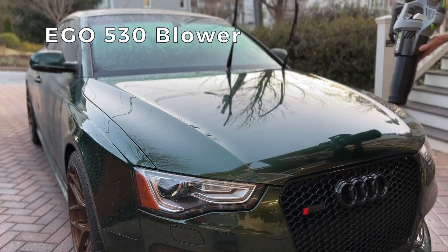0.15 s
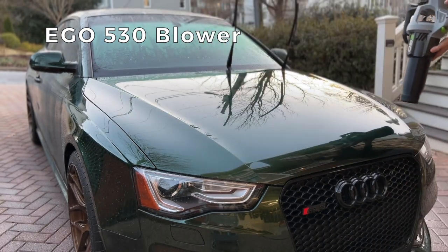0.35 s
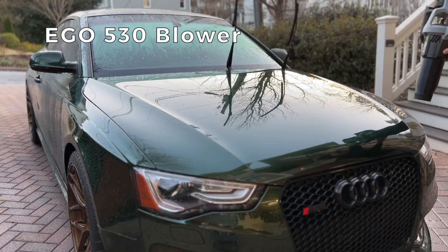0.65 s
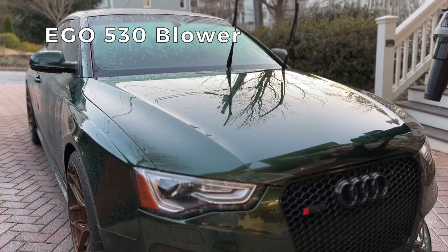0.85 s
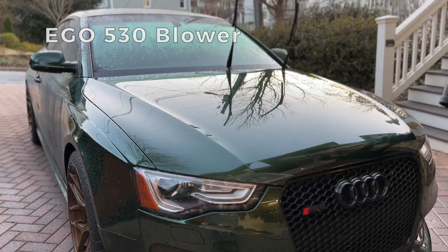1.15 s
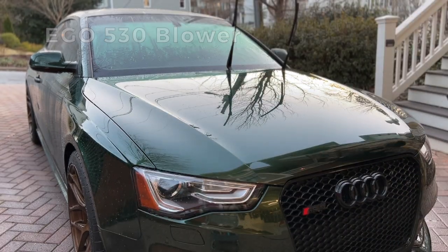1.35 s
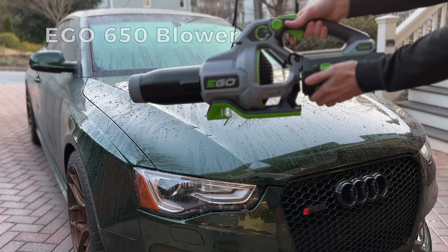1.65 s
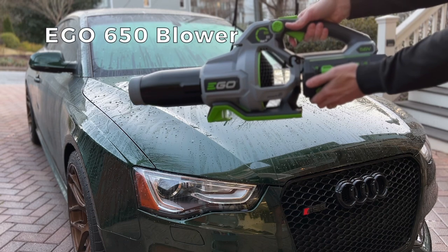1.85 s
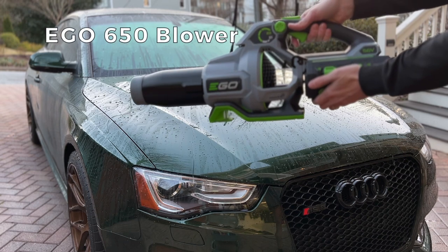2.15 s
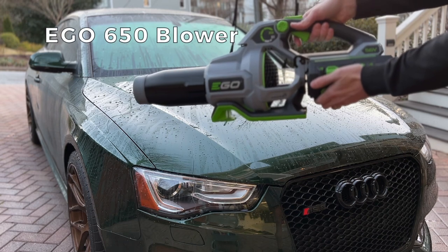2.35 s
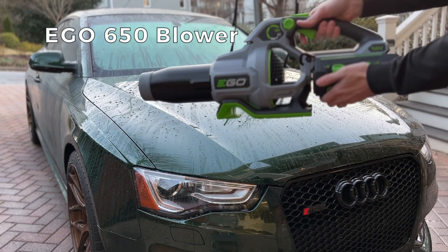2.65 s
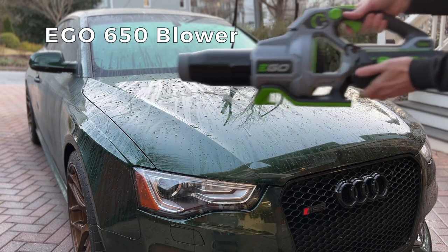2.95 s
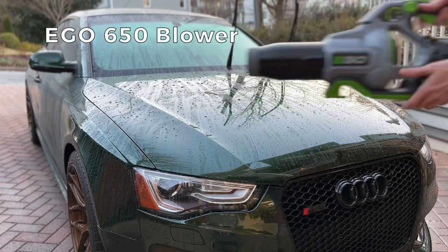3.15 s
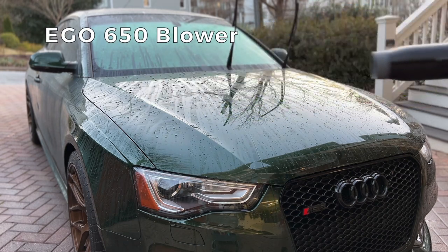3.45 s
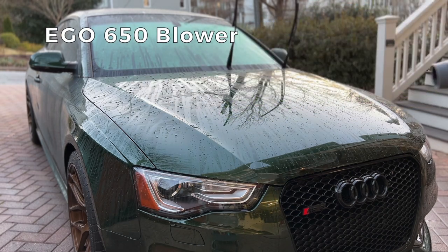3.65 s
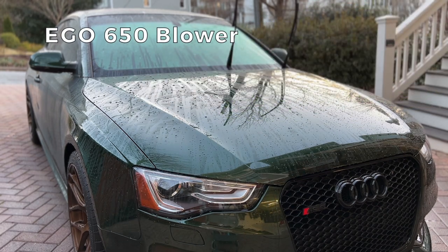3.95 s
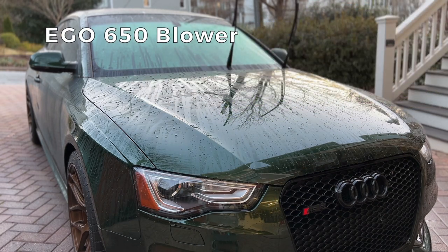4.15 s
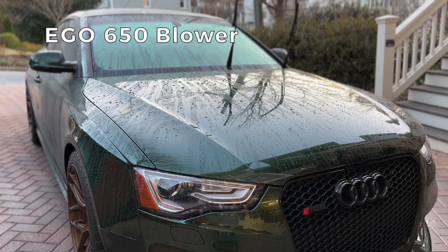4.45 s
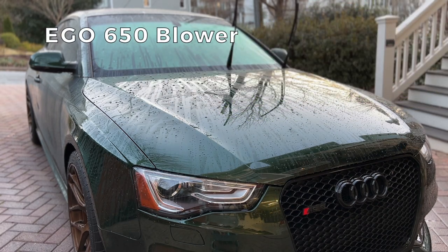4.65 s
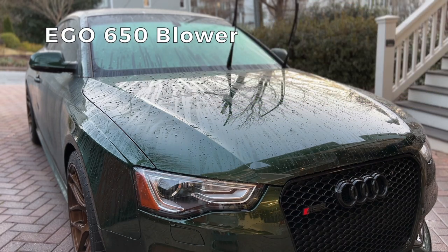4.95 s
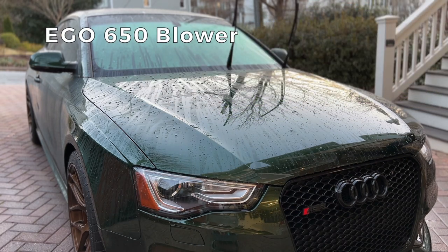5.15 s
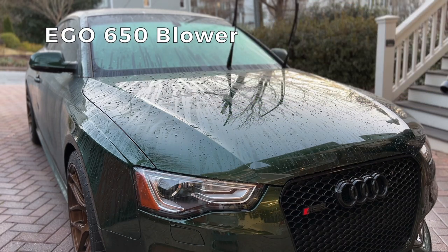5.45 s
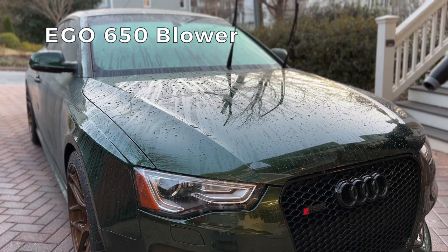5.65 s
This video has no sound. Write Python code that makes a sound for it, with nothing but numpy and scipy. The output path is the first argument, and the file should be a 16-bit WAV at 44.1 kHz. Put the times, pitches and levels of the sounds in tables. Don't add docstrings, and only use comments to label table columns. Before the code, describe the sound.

Outdoors in a driveway, close stereo microphone: a battery blower already at full speed roars with rumble, airy hiss and a fuzzy whistle. It briefly starts to slow, then cuts hard to a quiet yard with faint traffic, cloth rustle, small handling ticks and one buzzy bird call. Near the end a second blower kicks in with a ringing tube and whines quickly up to a bright, steady blast.

```python
import sys
import numpy as np
from scipy import signal
from scipy.io import wavfile
from scipy.ndimage import uniform_filter1d

SR = 44100
rng = np.random.default_rng(int(sys.argv[2]) if len(sys.argv) > 2 else 0)


def magnitude_from_level(level_db):
    exponent = np.asarray(level_db, float) / 20
    return 10 ** exponent


def dump(signal):
    limited = np.clip(np.atleast_2d(signal).T, -1, 1)
    pcm = np.round(limited * 32767).astype(np.int16)
    wavfile.write(sys.argv[1], SR, pcm)


N = 255780

# time in seconds, turns per second.
SHAFT_SPEED = [
    [(0, 370.6), (1.26, 370.6), (1.35, 338), (1.42, 315), (1.487, 300)],
    [(4.878, 120), (5.0, 165), (5.05, 212), (5.17, 295), (5.28, 352), (5.42, 417), (5.51, 444.3),
     (5.8, 444.3)],
]
# frequency in Hz, density in dB per Hz.
HISS_SPECTRUM = [(2500, -33.5), (4000, -1.5), (6500, -1.5), (9000, -5), (10300, -3.5), (12000, -0.5),
                 (14000, -5.5), (15500, -8)]
# frequency in Hz, left-right likeness from 0 to 1,
# radians the right leads beyond the delay, left minus right in dB.
MIC_PORTS = [(80, .998, -.04, .6), (250, .92, .2, .6), (700, .66, 1.0, -2.3), (1700, .7, .1, -2.3),
             (3400, .35, -.95, 1.3), (6200, .3, -.3, 1.3), (9000, .68, -.3, -1), (14500, .67, -.4, 0)]


def evened(x):
    return x / np.sqrt(np.mean(x ** 2) + 1e-20)


def read(points, hz, col=1):
    table = np.transpose(points)
    return np.interp(np.log(hz + 1), np.log(table[0] + 1), table[col])


def curves(rows, t):
    s, *columns = np.transpose(rows)
    return [np.interp(t, s, c) for c in columns]


def add(mix, s, sound):
    part = mix[..., round(s * SR):][..., :sound.shape[-1]]
    part += sound[..., :part.shape[-1]]


def drift(size, rate):
    smooth = round(SR / rate)
    once = uniform_filter1d(rng.standard_normal((2, size)), smooth)
    return evened(uniform_filter1d(once, smooth))


def resonate(x, hz, width):
    turn = np.exp(2j * np.pi * np.cumsum(hz * np.ones(x.shape[-1])) / SR)
    r = np.exp(-np.pi * width / SR)
    return 2 * (turn * signal.lfilter([1 - r], [1, -r], x / turn)).real


def lead_at(hz):
    port_delay_s = 152e-6
    return 2 * np.pi * hz * port_delay_s + read(MIC_PORTS, hz, col=2)


def diffuse(spectrum, size, patchy_db):
    frames, hz = size // 256 + 5, np.fft.rfftfreq(1024, 1 / SR)
    a, b, c, d, patches = rng.standard_normal((frames, 513, 5)).T
    patches = evened(uniform_filter1d(uniform_filter1d(patches, 14, 0), 12, 1))
    same = np.clip(read(MIC_PORTS, hz), 0, 1)[:, None]
    left = a + 1j * b
    right = same * left + np.sqrt(1 - same ** 2) * (c + 1j * d)
    right = right * np.exp(1j * lead_at(hz))[:, None]
    tilt = magnitude_from_level(read(MIC_PORTS, hz, 3) / 2)[:, None]
    z = np.array([left * tilt, right / tilt]) * magnitude_from_level(read(spectrum, hz)[:, None] + patchy_db * patches)
    return evened(signal.istft(z, nperseg=1024, noverlap=768)[1][:, :size])


def tone(hz, waver_db, lead=None):
    lead = np.array([[0], [lead_at(np.mean(hz)) if lead is None else lead]])
    swell = magnitude_from_level(waver_db * drift(len(hz), 22))
    return np.sqrt(2) * swell * np.cos(2 * np.pi * (np.cumsum(hz) / SR + rng.random()) + lead)


def glides(rows):
    out = np.zeros((2, N))
    for s, length, from_hz, to_hz, db in rows:
        hz = np.linspace(from_hz, to_hz, round(length * SR))
        add(out, s, magnitude_from_level(db) * tone(hz, 1.5) * np.hanning(len(hz)))
    return out


def level_db(row, t, speed):
    db, per_decade_db, swing_db, loudest_s = row
    swing_s = 1.2
    swing = swing_db * np.cos(2 * np.pi * (t - loudest_s) / swing_s)
    return db + per_decade_db * np.log10(speed / speed.max()) + swing


def blower(shaft, middle, layers, whistle, casing, parting, bright_db, nozzle, recede_db, orders, orders_db):
    # frequency in Hz, density in dB per Hz.
    rumble_spectrum = [(30, -39), (60, -4), (100, -4), (150, -7.5), (200, -3), (400, -1.5), (550, -6.5),
                       (800, -26.5)]
    jet_spectrum = [(300, -22.5), (600, -6.5), (800, -0.5), (1300, -1.5), (1600, 2.5), (2400, 1),
                    (3400, -0.5), (4200, -16.5), (5500, -29)]
    # time in seconds, spread in seconds, added rumble in dB.
    gusts = [(0.0, .06, 4.5), (.84, .07, 5), (1.3, .05, 3.5), (5.2, .08, 3.5)]
    # offset in shaft multiples, width in Hz, level in dB.
    cells = [(-.55, 50, -1), (-.05, 45, 0), (.38, 30, 0), (-.1, 480, 2)]
    t = np.arange(shaft[0][0], shaft[-1][0], 1 / SR)
    speed, = curves(shaft, t)
    jet, rumble, hiss = (magnitude_from_level(level_db(row, t, speed)) for row in layers)

    gust_db = sum(db * np.exp(-((t - s) / spread) ** 2) for s, spread, db in gusts)
    flow = rumble * magnitude_from_level(gust_db + 1.2 * drift(len(t), 12)[0]) * diffuse(rumble_spectrum, len(t), 0.56)
    tilted_hiss = [(hz, db + bright_db * np.log2(hz / 8000)) for hz, db in HISS_SPECTRUM]
    flow += hiss * magnitude_from_level(5.0) * diffuse(tilted_hiss, len(t), 1.6)
    flow += jet * magnitude_from_level(4.0) * diffuse(jet_spectrum, len(t), 1.6)

    spread, swirl = parting * (speed / speed.max()) ** 3, 0
    multiple = curves(middle, t)[0]
    for offset, width, db in cells:
        centre = speed * (multiple + offset * spread) * (1 + .004 * drift(len(t), 9)[0])
        cell = resonate(resonate(rng.standard_normal((2, len(t))), centre, width), centre, 3 * width)
        swirl = swirl + magnitude_from_level(db + 2.5 * drift(len(t), 9)[0]) * evened(cell)
    casing_hz, width, casing_db = casing
    near = (speed * multiple - casing_hz) / width
    flow += magnitude_from_level(level_db(whistle, t, speed) + casing_db * np.exp(-near ** 2)) * evened(swirl)

    nozzle_hz, width, nozzle_db = nozzle
    blown = evened(resonate(rng.standard_normal((2, len(t))), nozzle_hz, width))
    flow += jet * magnitude_from_level(nozzle_db + 1.4 * drift(len(t), 6.1)) * blown
    flow += jet * sum(magnitude_from_level(db) * tone(k * speed, 3.5) for k, db in zip(orders, orders_db))
    started = np.clip(np.where(t[0] > 0, (t - t[0]) / 0.023, 1), 0, 1)
    return t[0], started * magnitude_from_level(recede_db * (t - t[0])) * flow


def both_blowers():
    # time in seconds, shaft multiple.
    swirl_centre = [
        [(0, 8.05), (1.3, 8.05), (1.49, 7.8)],
        [(4.88, 8.0), (5.27, 8.2), (5.35, 7.7), (5.41, 7.8), (5.5, 7.9), (5.65, 8.2), (5.8, 8.35)],
    ]
    # level in dB, dB per tenfold speed,
    # swing depth in dB, loudest at seconds.
    air_layers = [
        [(-29, 54, -0.14, .2), (-27.5, 88, 0, 0.75), (-27, 56, 0.2, 0.11)],
        [(-32.5, 30.5, 0.13, 5.4), (-31.5, 55.5, 3, 5.3), (-25.5, 51, 0.1, 6.6)],
    ]
    swirl_level = [(-25.5, 45, 1.3, .17), (-28.5, 52, .3, 5.3)]
    # frequency in Hz, width in Hz, gain in dB.
    casing_modes = [(2600, 330, 6), (2300, 850, 12)]
    cell_parting = [1.0, 1.4]
    hiss_tilt = [-0.5, 2.5]
    # frequency in Hz, width in Hz, dB over the jet.
    nozzle_modes = [(1567, 22, -12.5), (2170, 130, -6)]
    recede = [-1.51, 0.04]
    # shaft multiples, then their dB over the jet.
    fan_orders = [
        [1, 9, 24, 36],
        [5, 20],
    ]
    fan_orders_db = [
        [-13, -23, -19, -24],
        [-14, -17.5],
    ]
    return [blower(*parts) for parts in zip(
        SHAFT_SPEED, swirl_centre, air_layers, swirl_level, casing_modes, cell_parting, hiss_tilt,
        nozzle_modes, recede, fan_orders, fan_orders_db)]


def motor_tones(shaft, orders, rows):
    t = np.arange(shaft[0][0], shaft[-1][0], 1 / SR)
    speed, = curves(shaft, t)
    return t[0], sum(magnitude_from_level(level_db(row, t, speed)) * tone(k * speed, 2.0, lead=np.pi / 3)
                     for k, row in zip(orders, rows))


def both_motors():
    magnet_orders = [
        [3, 6, 12, 18],
        [1, 9, 12],
    ]
    # level in dB, dB per tenfold speed, swing depth in dB,
    # loudest at seconds.
    magnet_levels = [
        [(-44, 120, 3, .94), (-42.5, 30, 4.5, .43), (-45, 220, 3, .03), (-44, 150, 2.5, .42)],
        [(-41, 85, 2, 5.58), (-46, 110, 6, 5.85), (-39, 400, 1.5, 5.75)],
    ]
    return [motor_tones(*parts) for parts in zip(SHAFT_SPEED, magnet_orders, magnet_levels)]


def panel_buffets():
    # start in seconds, length in seconds, from Hz, to Hz, level in dB.
    buffets = [(5.3, 0.22, 96, 101, -34.5), (5.32, 0.2, 148, 161, -37), (5.32, .16, 490, 170, -41),
               (0.68, 0.091, 210, 480, -32.5)]
    return glides(buffets)


def brief_whines():
    # start in seconds, length in seconds, from Hz, to Hz, level in dB.
    whines = [(1.32, .075, 13550, 12680, -30), (5.115, .09, 12780, 13250, -35),
              (5.195, .065, 12900, 13600, -30), (4.88, .2, 10085, 10085, -48),
              (5.405, .08, 4950, 5180, -33)]
    return glides(whines)


def yard():
    # frequency in Hz, density in dB per Hz.
    yard_spectrum = [(25, -18), (55, 0), (100, -8), (200, -13), (500, -20), (800, -29), (1300, -39),
                     (2500, -46), (5000, -50), (8000, -56), (10500, -57), (12500, -48), (14000, -62)]
    cloth_spectrum = [(800, 0), (1800, 12.5), (4000, -3.5), (7000, -2.5), (10000, 0), (12500, 7),
                      (15000, -9.5)]
    # hum frequency in Hz, level in dB.
    mains_hum = [(60, -63.5), (238, -78)]
    # time in seconds, held seconds, level in dB.
    cloth_rubs = [(2.62, .05, -99), (2.95, .01, -87.5), (3.29, .02, -85), (3.42, .03, -81.5),
                  (3.6, .06, -80.5), (3.89, .03, -84), (4.01, 0.075, -82), (4.22, 0.068, -86),
                  (4.53, 0.011, -86), (4.71, .04, -83.5), (4.84, .04, -75)]
    # time in seconds, level in dB.
    handling = [(2.94, -76), (3.132, -68), (3.325, -78.5), (3.435, -72), (4.345, -79), (4.705, -72.5)]
    rise_db_per_s, fade_db_per_s = 260, 80
    t = np.arange(N) / SR
    out = magnitude_from_level(-61.5 + .8 * drift(N, 3)[0]) * diffuse(yard_spectrum, N, 1.2)
    out += sum(magnitude_from_level(db) * tone(np.full(N, hz), 2.98) for hz, db in mains_hum)
    rubs = 0
    for s, held, db in cloth_rubs:
        rise_db = rise_db_per_s * np.maximum(s - t, 0)
        fade_db = fade_db_per_s * np.maximum(t - s - held, 0)
        rubs = rubs + magnitude_from_level(db - rise_db - fade_db)
    ticks = sum(magnitude_from_level(db - 60 * np.clip(t - s, 0, 1) / .07) * np.clip((t - s) / .004, 0, 1)
                for s, db in handling)
    out += (rubs * magnitude_from_level(2.0 + 2.0 * drift(N, 90)[0]) + ticks) * diffuse(cloth_spectrum, N, 2.5)
    return out + magnitude_from_level(-5.0) * ticks * diffuse(HISS_SPECTRUM, N, 1.0)


def far_notes():
    # start in seconds, length in seconds, from Hz, to Hz, level in dB.
    notes_far_off = [(1.56, 0.16, 432, 427, -66.5), (1.64, 0.055, 1880, 1840, -85),
                     (1.84, 0.043, 1850, 1850, -82), (1.92, .08, 1850, 1850, -90.5),
                     (2.73, 0.15, 3900, 3880, -80), (2.77, 0.056, 422, 430, -64),
                     (3.29, .05, 1850, 1860, -81)]
    return glides(notes_far_off)


def bird():
    # time in seconds, level in dB, lowest Hz, highest Hz.
    call_path = [(3.93, -89, 2100, 2500), (3.995, -72, 2440, 2950), (4.03, -59, 2690, 3330),
                 (4.16, -58.5, 3040, 4230), (4.231, -66, 3140, 4400), (4.36, -77, 3210, 4260),
                 (4.55, -94, 3350, 4180)]
    t = np.arange(call_path[0][0], call_path[-1][0], 1 / SR)
    db, low_hz, high_hz = curves(call_path, t)
    buzz_hz = 243 * (1 + 0.118 * drift(len(t), 153)[0])
    swing = .5 + .5 * np.sin(2 * np.pi * np.cumsum(buzz_hz) / SR)
    pitch_hz = low_hz + (high_hz - low_hz) * swing
    call = magnitude_from_level(db) * (0.69 + swing) * np.sin(2 * np.pi * np.cumsum(pitch_hz) / SR)
    echoes = rng.standard_normal((2, SR // 2)) * magnitude_from_level(-60 * np.arange(SR // 2) / SR / .62)
    echoes /= np.linalg.norm(echoes[0])
    echoes[:, 0] = 0.44
    return t[0], signal.fftconvolve(call[None], echoes, axes=1) * magnitude_from_level([[1], [-1]])


def kick():
    # frequency in Hz, width in Hz, level in dB.
    tube_modes = [(440, 60, -3), (800, 70, -8), (1250, 60, -3), (1560, 45, 1), (2270, 100, -6),
                  (6300, 250, -10), (12300, 700, -12)]
    # from Hz, to Hz, level in dB.
    coil_notes = [(460, 455, -4), (425, 390, -5), (1560, 1555, -7)]
    start_s, rise_s, hold_s, fade_db_per_s = 4.879, .004, 0.12, 125
    t = np.arange(0, .3, 1 / SR)
    cogs = (rng.random(len(t)) < 260 / SR) * rng.standard_normal(len(t))
    drive = evened(cogs) + .5 * rng.standard_normal((2, len(t)))
    rung = sum(magnitude_from_level(db) * evened(resonate(resonate(drive, hz, width), hz, 2 * width))
               for hz, width, db in tube_modes)
    coils = sum(magnitude_from_level(db) * tone(np.interp(t, [0, .17], hz), 1.4, lead=0.98) for *hz, db in coil_notes)
    rung = evened(rung) + coils
    db = -43.5 - fade_db_per_s * np.maximum(t - hold_s, 0)
    return start_s, np.minimum(t / rise_s, 1) ** 2 * magnitude_from_level(db + [[-1.5], [1.5]]) * evened(rung)


def scene():
    change_s = 1.487
    mix = yard() * (np.arange(N) > change_s * SR)
    mix += panel_buffets() + brief_whines() + far_notes()
    for start_s, sound in both_blowers() + both_motors() + [bird(), kick()]:
        add(mix, start_s, sound)
    return mix


def band_limit(x):
    return signal.sosfilt(signal.butter(12, 16250, fs=SR, output="sos"), x)


def record(dry):
    # 0 mid or 1 side, lowest Hz, highest Hz, share of frames an edge creeps inward.
    holes = [(0, 9350, 11200, .6), (1, 12300, 15200, .45), (0, 15300, 22050, .7), (1, 15750, 22050, 0)]
    # frequency in Hz, level in dB.
    faint_floor = [(5000, -126), (7500, -116), (10500, -114), (12500, -118), (15000, -106)]
    mask_db, masker_db = -17.5, -86
    x = signal.sosfilt(signal.butter(4, 55, "high", fs=SR, output="sos"), dry)
    pad = 1024 - 134
    pair = np.pad([x[0] + x[1], x[0] - x[1]], ((0, 0), (pad, 0)))
    hz, t, z = signal.stft(pair, SR, "cosine", nperseg=2048, noverlap=1024)
    for k, low_hz, high_hz, share in holes:
        creep = 345 * (rng.random((2, 2, len(t))) < [[[share]], [[share / 3]]]).sum(0)
        z[k] *= (hz[:, None] < low_hz + creep[0]) | (hz[:, None] > high_hz - creep[1])

    bands = (abs(z[:, :1024]) ** 2).reshape(2, 64, 16, -1).mean(2).repeat(16, axis=1)
    below = np.max([np.roll(bands, 16 * k, axis=1) for k in range(1, 5)], axis=0)
    band_hz = hz[:1024, None]
    audible = bands > magnitude_from_level(2 * read(faint_floor, band_hz))
    unmasked = (bands > magnitude_from_level(2 * mask_db) * below) | (below < magnitude_from_level(2 * masker_db)) | (band_hz > 6000)
    z[:, :1024] *= (audible & unmasked) | (band_hz < 3400)
    mid, side = signal.istft(z, SR, "cosine", nperseg=2048, noverlap=1024)[1][:, pad:pad + N]
    return band_limit(np.array([mid + side, mid - side]) / 2)


dry = scene()
out = record(dry)
dump(out)
```